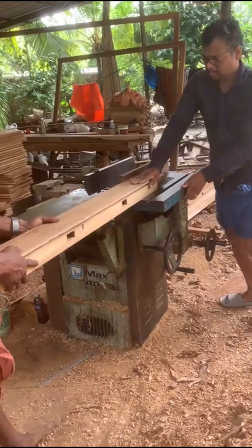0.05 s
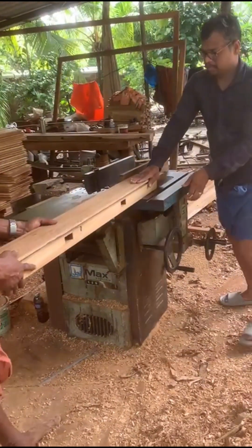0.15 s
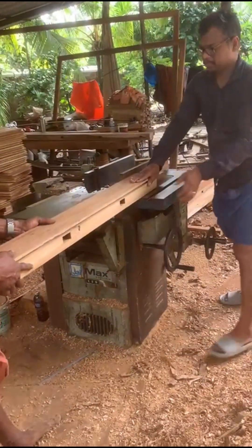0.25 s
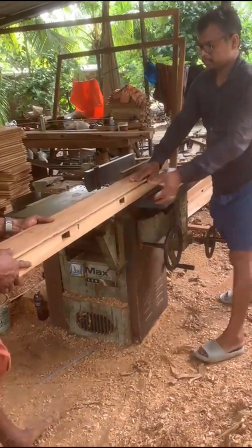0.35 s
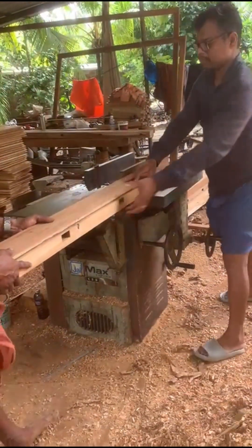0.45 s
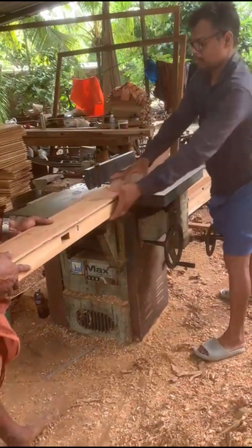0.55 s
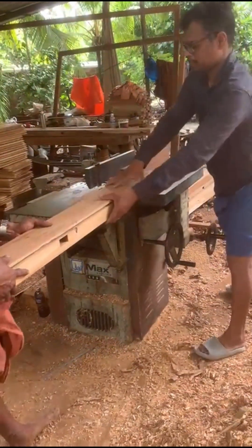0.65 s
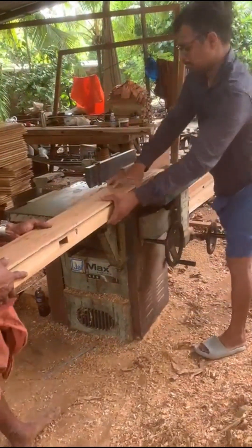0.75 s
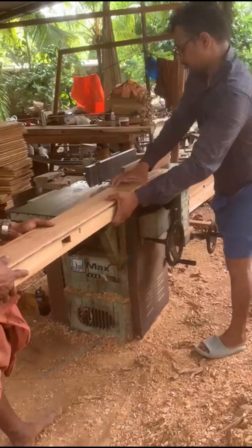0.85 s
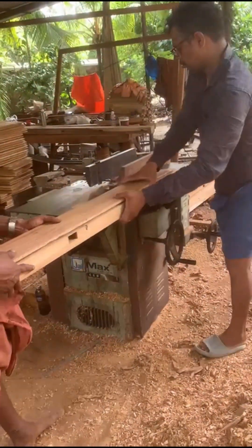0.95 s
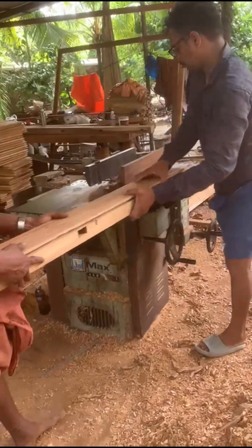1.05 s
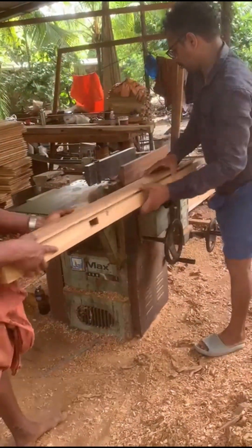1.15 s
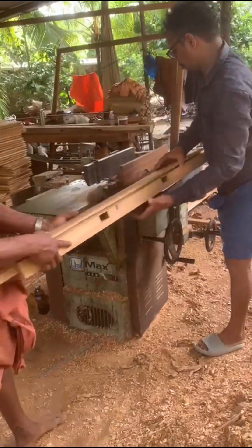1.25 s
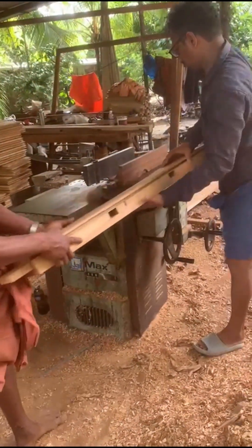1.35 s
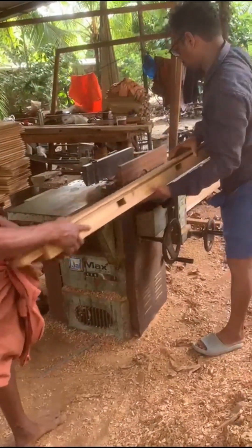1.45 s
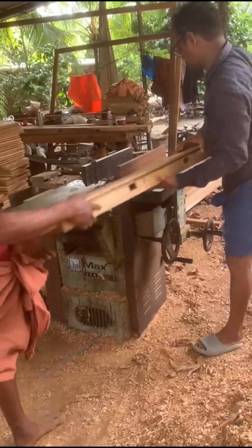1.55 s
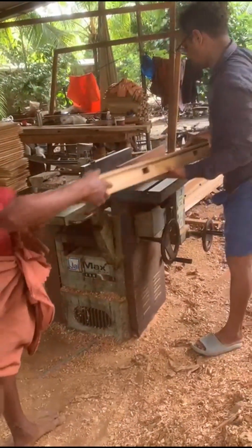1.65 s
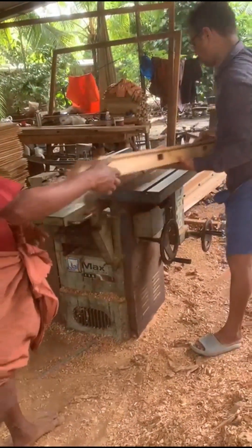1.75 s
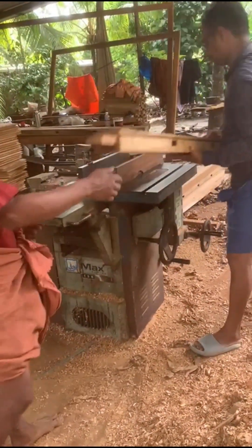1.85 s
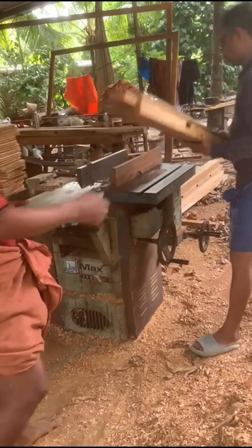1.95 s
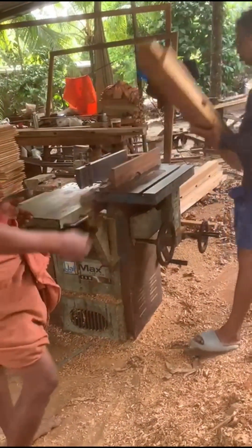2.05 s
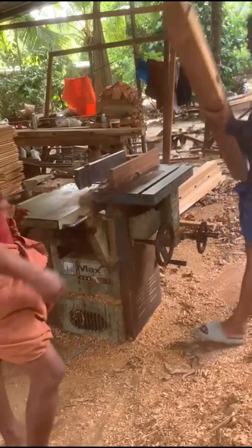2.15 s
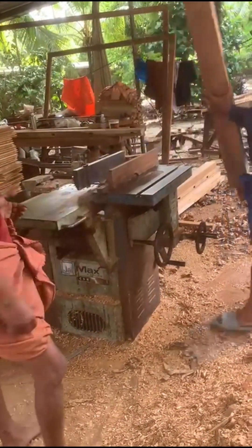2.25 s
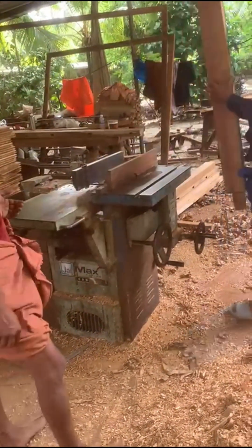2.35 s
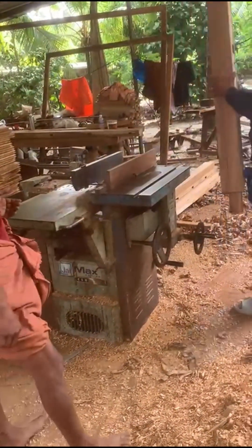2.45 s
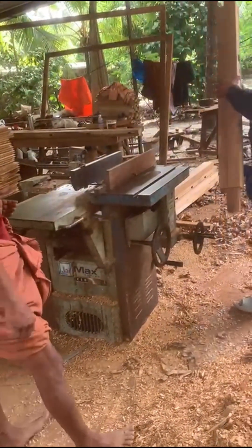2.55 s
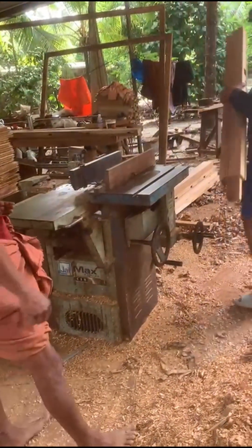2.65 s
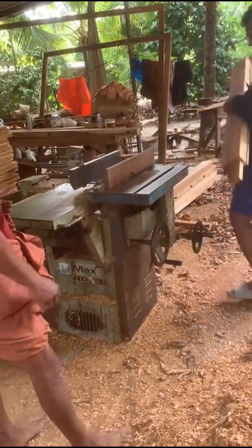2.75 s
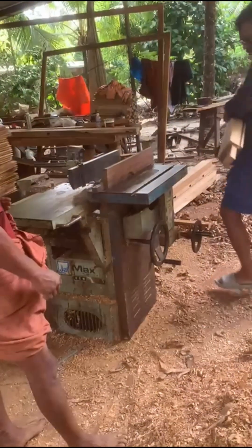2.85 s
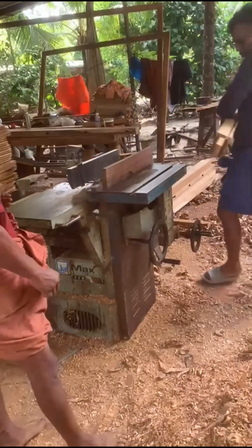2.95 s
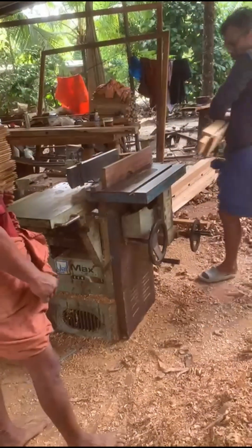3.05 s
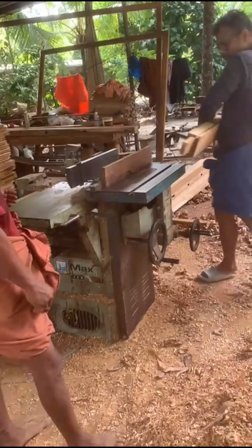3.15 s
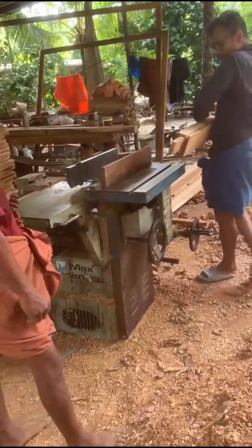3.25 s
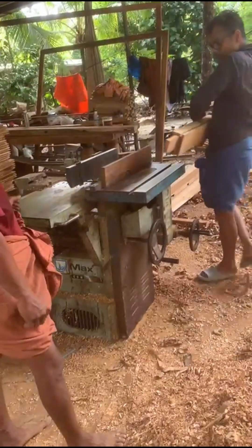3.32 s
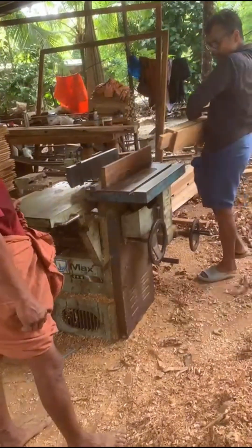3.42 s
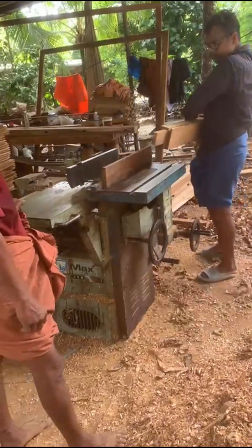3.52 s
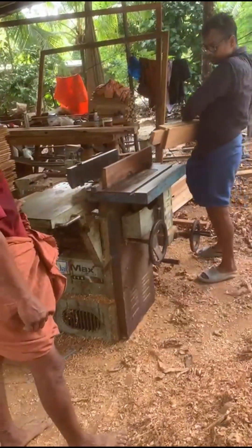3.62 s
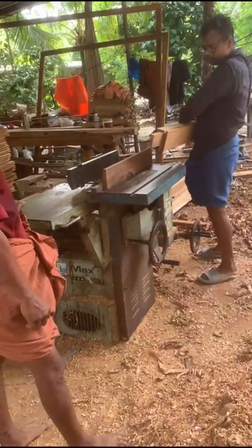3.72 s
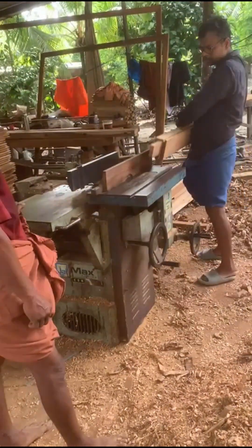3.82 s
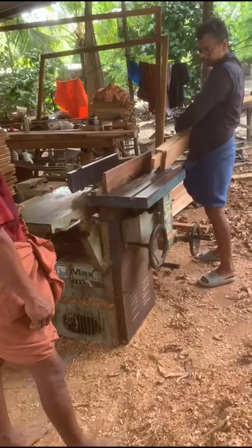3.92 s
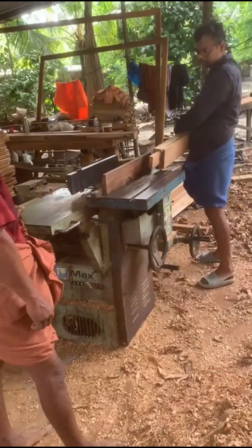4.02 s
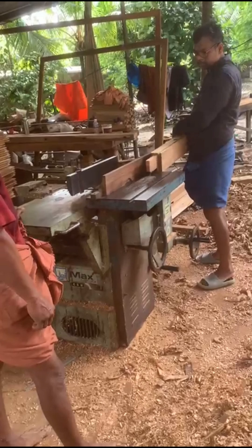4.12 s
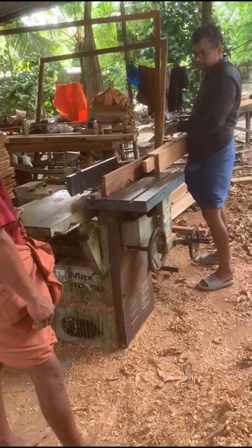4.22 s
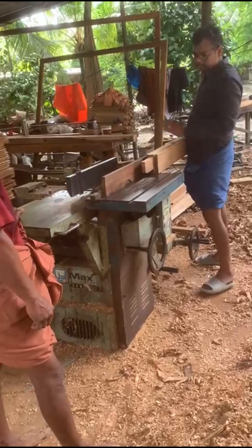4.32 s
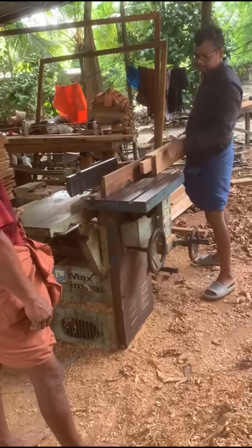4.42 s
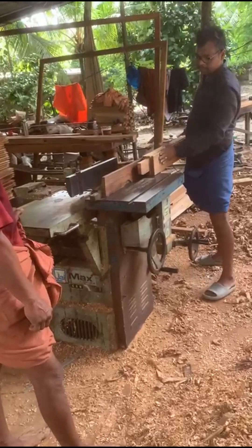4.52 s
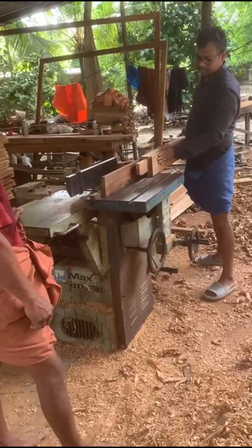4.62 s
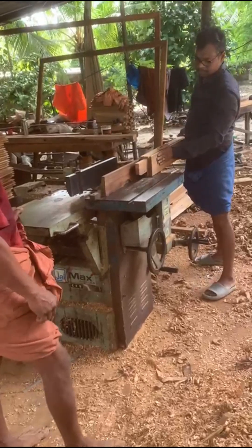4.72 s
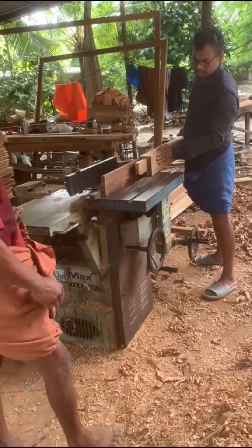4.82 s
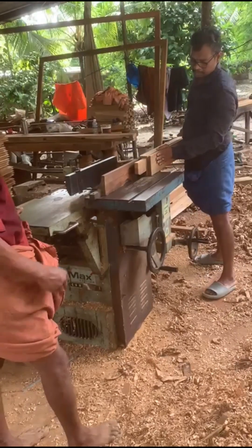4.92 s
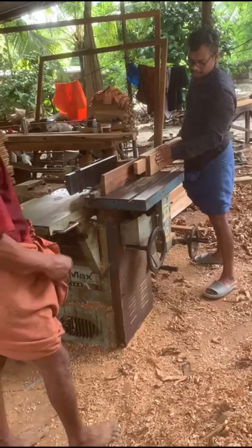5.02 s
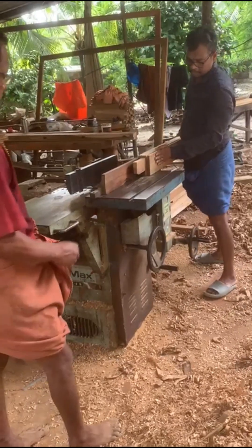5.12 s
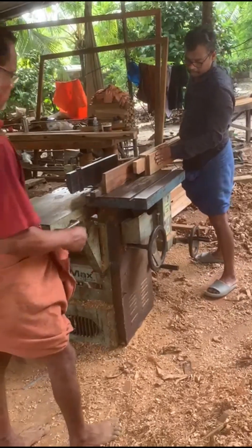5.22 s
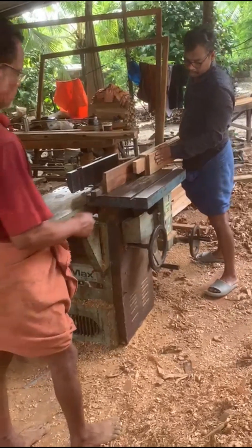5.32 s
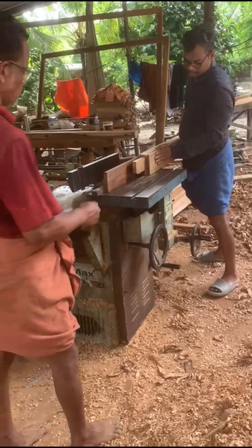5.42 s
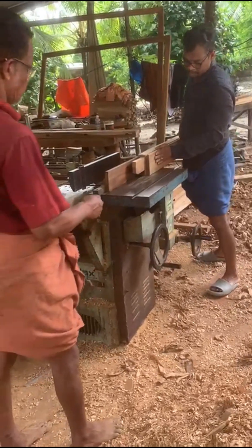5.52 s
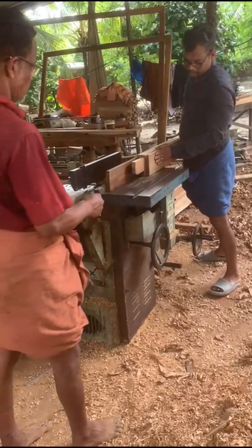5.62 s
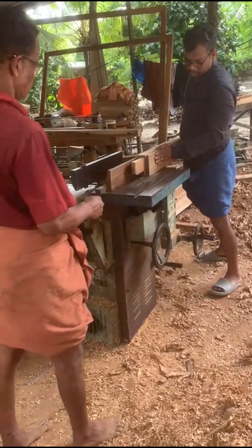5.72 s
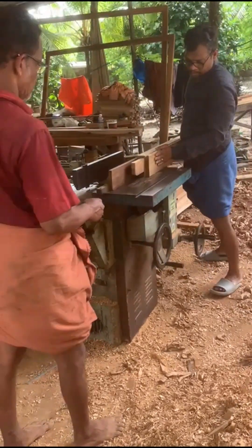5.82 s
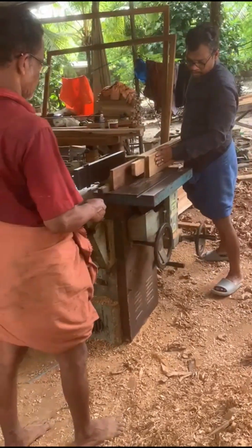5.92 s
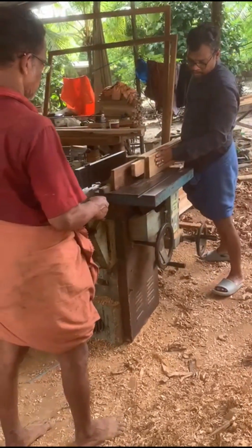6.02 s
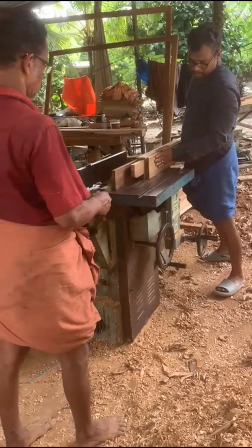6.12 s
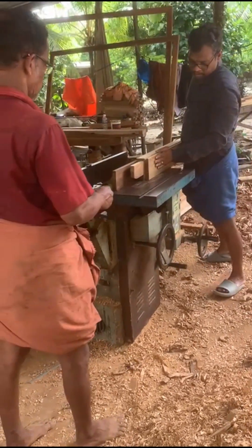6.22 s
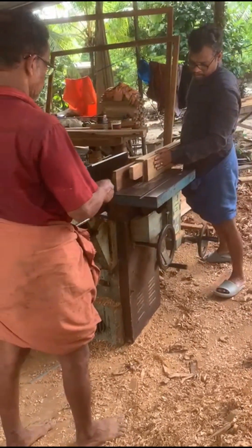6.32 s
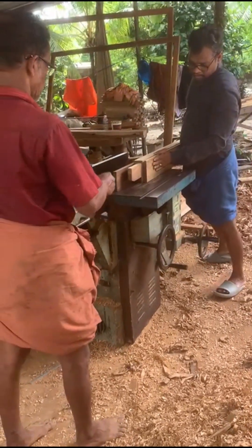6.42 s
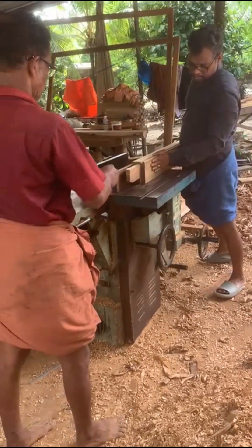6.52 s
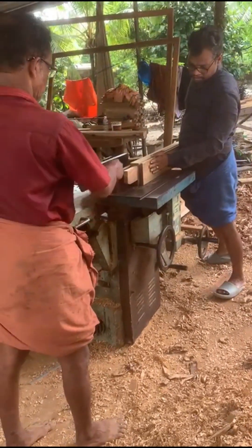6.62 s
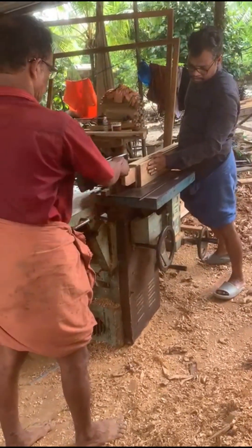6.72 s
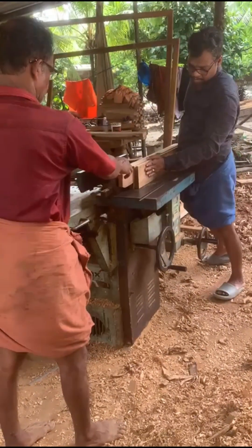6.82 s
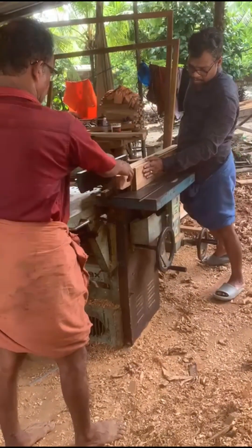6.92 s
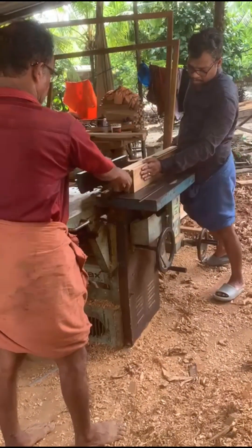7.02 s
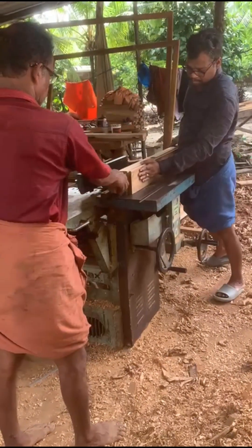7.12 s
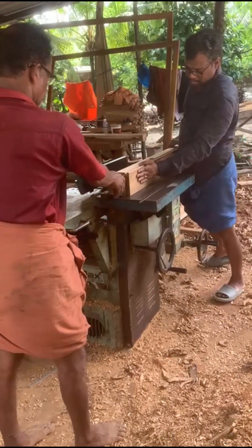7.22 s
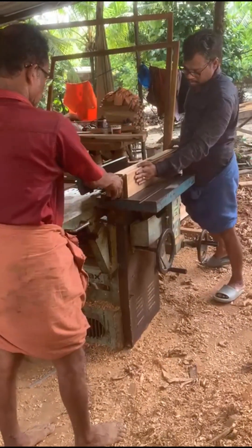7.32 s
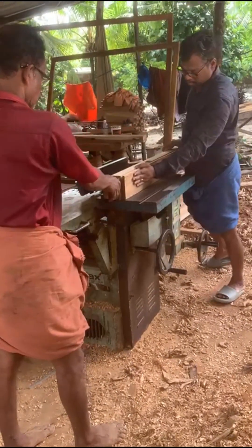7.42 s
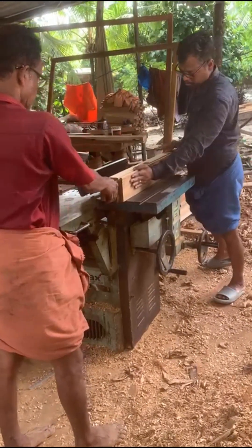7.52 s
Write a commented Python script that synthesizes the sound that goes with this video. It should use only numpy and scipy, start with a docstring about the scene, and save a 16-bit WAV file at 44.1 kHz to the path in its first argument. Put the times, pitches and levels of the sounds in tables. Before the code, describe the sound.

A woodworking planer idles with a throbbing hum and airy hiss, a plank knocks onto its table, then the knives bite with a loud, rasping, whining buzz.

```python
"""Wood planer in an open shed

A belt-driven planer idles: its three-knife cutter block hums, throbs and fans the air in shaped noise.
A plank knocks down on the table as short decaying modes; at six seconds it is pushed into the knives.
Chip noise hisses, knife impulses buzz and slap, sines whine at orders of the turning rate, and the
block slows a little. A helper steps in front and screens the rumble, throb and most knife-hum lines.
A microphone with two ports hears much of this out of step between its sides."""
import sys
import numpy as np
from scipy import signal
from scipy.fft import rfft, irfft, next_fast_len
from scipy.io import wavfile
from scipy.ndimage import uniform_filter1d, map_coordinates

SR = 44100
rng = np.random.default_rng(int(sys.argv[2]) if len(sys.argv) > 2 else 0)


def output_pcm(signal):
    """Save a mono or channel-first signal as 16-bit PCM at the path in sys.argv[1].

    Samples are clipped to [-1, 1] before scaling.
    """
    pcm = np.clip(np.atleast_2d(signal).T, -1, 1) * 32767
    wavfile.write(sys.argv[1], SR, np.round(pcm).astype(np.int16))


N = 333835
SECONDS = np.arange(N) / SR
SIDES = np.array([[1], [-1]])  # the two microphone ports

KNIVES = 3
# how hard each of the three knives strikes: level_db
KNIFE_LEVELS = [-3, -2, 0]
# spectrum of the wood under the knives, before levelling: freq_hz, level_db
CHIP_SPECTRUM = [(250, -36), (600, -11.5), (1050, -8.5), (1230, -18), (1550, -4), (2100, -3), (2320, -16.5),
                 (2500, -1.5), (2850, -12), (3100, -22), (3600, -20), (4050, -7.5), (4450, 0.5), (5300, 3),
                 (5700, -6), (5950, -1.5), (6400, -3), (7100, 2), (7500, -4.5), (8000, 3.5), (8300, 2),
                 (8550, -11.5), (10000, -1.5), (10700, -14), (11250, 0.5), (11700, -13)]
# the plank meets the knives and is cut to full depth within a moment
ENTRY_S, ENTRY_RISE_S = 5.987, .08


def amp(db):
    """Decibels to gain."""
    return 10 ** (np.asarray(db) / 20)


def unit(x):
    """x at rms 1."""
    return x / np.sqrt(np.mean(x ** 2) + 1e-20)


def along(points, hz):
    """(Hz, value) points read on a log axis."""
    f, v = np.transpose(points)
    return np.interp(np.log(hz + 1), np.log(f + 1), v)


def wobble(rate, step=16):
    """A smooth random curve, rate knots a second, drawn every step samples and joined by lines."""
    at = np.arange(0, N + step, step)
    knots = rng.standard_normal(int(N * rate / SR) + 4)
    return np.interp(np.arange(N), at, map_coordinates(knots, [at * rate / SR]))


def filtered(x, response):
    """x times a response of frequency."""
    m = next_fast_len(N + SR // 2)
    return irfft(rfft(x, m) * response(np.fft.rfftfreq(m, 1 / SR)), m)[..., :N]


def coloured(x, spectrum):
    """x shaped by (Hz, dB) points, at rms 1."""
    return unit(filtered(x, lambda hz: amp(along(spectrum, hz))))


def patchy(x, depth_db, size):
    """Resonances come and go: random gain in patches of size (bins, frames)."""
    z = signal.stft(x, nperseg=1024)[2]
    field = rng.standard_normal(z.shape[1:])
    for axis in (0, 1):
        field = uniform_filter1d(field, size[axis], axis=axis)
    return signal.istft(z * amp(depth_db * unit(field)), nperseg=1024)[1][:, :N]


def tone(turns, waver_db, drift, rate=6):
    """A sine of rms 1 whose level (dB) and phase (radians) wander, rate times a second."""
    phase = 2 * np.pi * turns + rng.uniform(-np.pi, np.pi) + drift * wobble(rate)
    return unit(amp(waver_db * wobble(rate)) * np.cos(phase))


def ramp(start_s, length_s):
    """0 before the start, rising evenly to 1."""
    return np.clip((SECONDS - start_s) / length_s, 0, 1)


def swell(s, length_s):
    """A smooth bump of height 1 centred on s."""
    return np.exp(-(2 * (SECONDS - s) / length_s) ** 2)


def idled():
    """Seconds of idling so far; stops counting when the cut begins."""
    return np.minimum(SECONDS, ENTRY_S)


def screened():
    """How far the helper, stepping in front, screens the machine, 0-1."""
    return ramp(6.52, .2)


def speed():
    """Turns per second: the cut slows the block, which then begins to recover."""
    idle_hz, sag_hz, recover_hz_per_s = 72.06, .9, .4
    sag = sag_hz * ramp(6.15, .5)
    return idle_hz - sag + recover_hz_per_s * np.maximum(SECONDS - 7.1, 0)


def firmness():
    """How firmly the plank lies, 0-1: it settles flat on the tables, then works a little loose."""
    return np.interp(SECONDS, [6.5, 6.74, 7.05, 7.25], [.35, .72, .72, .45])


def catches():
    """The knives meet changing grain: brief level changes (dB) of the cut and of the slapping."""
    # moments of catching: centre_s, length_s, cut_change_db, slap_change_db
    catch_rows = [(6.02, 0.02, 2.5, -14), (6.098, 0.05, 2.3, 7), (6.16, 0.04, 2.5, -4),
                  (6.24, 0.05, 2.5, -14), (6.42, 0.04, 1.5, -6), (6.485, 0.05, 3, -8),
                  (6.565, 0.04, 2.5, -8), (6.715, 0.05, 2.5, 0), (6.775, 0.06, 3.5, 1),
                  (6.895, 0.06, 4.5, 2), (6.97, .04, 1.5, 1), (7.04, 0.08, 3, 1.5), (7.29, .07, -1.5, -3),
                  (7.42, 0.05, 4, 6), (7.56, 0.07, 3.5, -1)]
    return sum(np.outer([cut_db, slap_db], swell(s, length_s)) for s, length_s, cut_db, slap_db in catch_rows)


def flare(k):
    """Extra level (dB) where the k-th multiple of the turning rate flares or fades briefly."""
    # flaring lines: centre_s, length_s, multiple_of_turning_rate, change_db
    flare_rows = [(0.095, 0.82, 12, -14), (.1, 0.8, 15, -11), (2.4, 1.2, 15, 3.5), (.5, 0.84, 24, -15),
                  (.6, 1.8, 18, -5.5), (1.7, 0.82, 1, 3), (2.007, 0.36, 6, 3), (2.368, 0.4, 6, -6),
                  (2.65, 1, 1, -1.5), (3.6, 0.75, 1, 4), (4.498, 0.51, 18, 5), (4.45, 1.4, 6, 1.5),
                  (5.303, 0.68, 1, 4.5), (6.42, 0.8, 3, 3), (7.55, 0.54, 12, -19)]
    return sum(db * swell(s, length_s) for s, length_s, multiple, db in flare_rows if multiple == k)


def blows(turns, knife):
    """One band-limited impulse a turn, when the given knife meets the wood."""
    turn_ends = np.arange(1, int(turns[-1]) - 1)
    at = np.interp(turn_ends + knife / KNIVES, turns, np.arange(N))
    # a short sinc places each impulse between samples
    taps = at.astype(int)[:, None] + np.arange(-8, 9)
    return np.bincount(taps.ravel(), np.sinc(taps - at[:, None]).ravel(), N)[:N]


def draught(turns, split_hz=2200, pulsing=.35, flutter_db=.98):
    """Air rushes round the block: the rumble puffs as each knife passes, the hiss flutters."""
    # spectrum of the thrown air, before levelling: freq_hz, level_db
    air_spectrum = [(25, -21), (55, 1), (150, -2.5), (300, 1), (450, 0.5), (1000, 2), (1250, -7),
                    (1500, -5), (2000, -3.5), (2600, -29.5), (3600, -1), (4800, -13), (6000, -15.5),
                    (8000, -13), (11500, -16)]
    # both grow slowly louder until the cut; the helper screens the rumble by 4 dB
    rumble_db = -44.5 + 1.0 * idled() - 4 * screened()
    hiss_db = -45 + 1.2955 * idled() + flutter_db * wobble(14)
    puffs = 1 + pulsing * np.cos(2 * np.pi * KNIVES * turns)
    air = coloured(patchy(rng.standard_normal((2, N)), depth_db=2.5, size=(6, 6)), air_spectrum)
    low = filtered(air, lambda hz: 1 / (1 + (hz / split_hz) ** 4))
    return amp(rumble_db) * low * puffs + amp(hiss_db) * (air - low)


def shake(turns, belt_hz=84.4, belt_db=-5.0):
    """Block unbalance and belt flapping shake the frame and beat together in a low throb."""
    unbalance = tone(turns, waver_db=-.5, drift=.1)
    belt = tone(belt_hz * SECONDS, waver_db=4.0, drift=.72)
    level_db = -53.5 + .39 * idled() - 5 * screened() + flare(1)
    return amp(level_db) * (unbalance + amp(belt_db) * belt)


def hum(turns, drift_per_order=.012, jitter_turns=.004):
    """Knives chop the air at the table lips; higher block lines waver; motor and bearings add lines."""
    # knives passing the lips: multiple_of_turning_rate, level_db, swell_db_per_s, screen_loss_db, waver_db
    lip_lines = [(3, -42, 0.57, 2, 0.55), (6, -47, 1.22, 5, 1), (12, -45, -0.06, -1.5, 2),
                 (15, -46, -.4, 10, 2)]
    # weaker lines of the block: multiple_of_turning_rate, level_db
    block_lines = [(2, -57), (4, -59), (9, -52.5), (18, -52), (24, -51.5), (27, -52), (30, -49)]
    # motor, belt and bearings: freq_hz, level_db
    motor_lines = [(258, -66.5), (305.5, -57), (334.4, -58.5), (918, -58.5), (974.4, -52.5),
                   (1030.9, -51.5), (1060.5, -57), (1392, -57), (1698, -57)]
    out = np.zeros(N)
    for k, db, swell_db, loss_db, waver_db in lip_lines:
        level_db = db + swell_db * idled() - loss_db * screened() + flare(k)
        out += amp(level_db) * tone(k * turns, waver_db, drift=.04, rate=2.99)
    shaken = turns + jitter_turns * wobble(30)
    for k, db in block_lines:
        out += amp(db + flare(k)) * tone(k * shaken, waver_db=4.5, drift=drift_per_order * k, rate=24)
    for hz, db in motor_lines:
        out += amp(db) * tone(hz * SECONDS, waver_db=1.5, drift=1.0)
    return out


def knocks(soft_s=.002, thud_db=-6, thud_s=.09, scatter_db=1.3):
    """The plank lands on the iron table: a thud and a short ring, duller at a low contact brightness."""
    # the plank set down: start_s, level_db (before the low-pass), brightness_hz (low-pass corner)
    landings = [(4.005, -28, 500), (4.029, -27, 450), (4.196, -31, 1400), (4.207, -22, 320),
                (4.251, -27, 1500), (4.259, -23, 1200), (4.277, -28, 1200)]
    # modes of the plank: freq_hz, level_db (before scatter), t60_s
    plank_modes = [(139, -12, 0.05), (250, -5, 0.08), (298, -10, 0.06), (436, -9, .06), (610, -4.5, 0.07),
                   (700, -8, .06), (1044, -14, 0.04)]
    out, t = np.zeros(N + SR), np.arange(SR // 4) / SR
    thud_band = signal.butter(2, [150, 1100], "band", fs=SR, output="sos")
    for s, db, bright_hz in landings:
        ring = sum(amp(level_db + rng.normal(0, scatter_db) - 60 * t / t60_s) * np.sin(2 * np.pi * hz * t)
                   for hz, level_db, t60_s in plank_modes)
        thud = unit(signal.sosfilt(thud_band, rng.standard_normal(len(t))))
        blow = (ring + thud * amp(thud_db - 60 * t / thud_s)) * (1 - np.exp(-t / soft_s))
        dulling = signal.butter(2, bright_hz, fs=SR, output="sos")
        out[round(s * SR):][:len(t)] += amp(db) * signal.sosfilt(dulling, blow)
    return out[:N]


def drone(turns):
    """Coming to lie on both tables, the plank hums at low orders that enter at staggered times."""
    # the bending drone: multiple_of_turning_rate, level_db, start_s, rise_s
    drone_lines = [(8, -49, 6.1, .7), (9, -53, 6.6, .6), (11, -43, 6.6, .4), (12, -53, 6.5, .4),
                   (14, -46.5, 6.65, .3), (15, -53, 6.5, .5)]
    return sum(ramp(start_s, rise_s) * amp(db) * tone(k * turns, waver_db=1.5, drift=.15)
               for k, db, start_s, rise_s in drone_lines)


def squeals(turns, pulsing=.7, rasp_per_order=.009, rasp_per_s=90):
    """The sliding plank falls in step with the knives: a rasping squeal that pulses once a turn."""
    # brief squeals: centre_s, length_s, multiple_of_turning_rate, level_db
    squeal_rows = [(6.12, .08, 83, -30), (6.27, .07, 83, -28), (6.41, .07, 83, -27), (6.58, .1, 83, -29),
                   (6.73, .11, 83, -29), (6.87, .07, 83, -32), (7.04, .17, 83, -28), (6.17, .06, 57, -33),
                   (6.5, .05, 63, -29), (6.18, .08, 29, -35), (6.265, .08, 27, -27.5), (6.27, .08, 34, -31),
                   (6.28, .17, 15, -38.5), (7.22, .16, 30, -37), (7.54, .09, 29, -34)]
    strokes = 5 + pulsing * np.cos(2 * np.pi * (turns - np.argmax(KNIFE_LEVELS) / KNIVES))
    out = np.zeros(N)
    for s, length_s, k, db in squeal_rows:
        rasp = tone(k * turns, waver_db=3, drift=rasp_per_order * k, rate=rasp_per_s)
        out += amp(db) * swell(s, length_s) * unit(strokes * rasp)
    return out


def chatter(turns, uneven_db=.8, contact_s=.0007):
    """The proudest knife slaps the plank on the table once a turn; its modes reach the ports out of step."""
    # modes of the slap, before levelling: freq_hz, level_db, t60_s, port_phase_rad
    slap_modes = [(1425, 9, 0.04, 2.2), (1505, 12, .025, 1.3), (1705, 8, 0.04, 1.8), (3220, 2, .022, 2.3),
                  (4050, 4, .012, 1.6), (4560, 14, .018, 2.0), (5920, 7, 0.018, -1), (7120, 3, .008, 0),
                  (8200, 6, .006, 1.2)]
    t = np.arange(SR // 8) / SR
    contact = (1 - np.exp(-t / contact_s)) ** 2
    strikes = blows(turns, np.argmax(KNIFE_LEVELS))
    slaps = np.zeros((2, N))
    for hz, db, t60_s, lead in slap_modes:
        ring = contact * amp(db - 60 * t / t60_s) * np.sin(2 * np.pi * hz * t + SIDES * lead / 2)
        uneven = strikes * amp(uneven_db * wobble(7.3))  # each mode swells on its own
        slaps += signal.oaconvolve(uneven[None], ring, axes=1)[:, :N]
    level_db = -43 + 21.5 * firmness() + catches()[1]
    return ramp(ENTRY_S, ENTRY_RISE_S) * amp(level_db) * unit(slaps)


def tearing(turns, strike_turns=.93, sustain=1.0, bright_hz=4500):
    """Each knife tears off a chip: bright noise jumps up at the strike and eases off until the next."""
    knife, since = np.divmod(turns * KNIVES, 1)
    force = amp(KNIFE_LEVELS)[knife.astype(int) % KNIVES]
    burst = sustain + force * np.exp(-since / KNIVES / strike_turns)
    # the plank's narrow resonances shift as it slides, and its grain varies the effort
    fibres = patchy(rng.standard_normal((2, N)), depth_db=5, size=(2, 9)) * amp(.8 * wobble(30))
    bright = filtered(fibres * burst, lambda hz: hz / np.hypot(hz, bright_hz))
    return coloured(bright, CHIP_SPECTRUM)


def buzzing(turns, ring_s=.016, shed_s=.2, shed_db=-15, shift_rate=9, count=6):
    """Every knife cracks the plank and the shed answers; each knife's ring changes as the cut moves."""
    out, t = np.zeros((2, N)), np.arange(SR // 8) / SR
    decay = amp(-60 * t / ring_s) + amp(shed_db - 60 * t / shed_s)
    for knife, db in enumerate(KNIFE_LEVELS):
        # a shifting blend of several noise rings, at constant power
        blend = np.array([wobble(shift_rate) for _ in range(count)])
        blend /= np.linalg.norm(blend, axis=0)
        for strikes in amp(db) * blows(turns, knife) * blend:
            ring = decay * rng.standard_normal((2, len(t)))
            out += signal.oaconvolve(strikes[None], ring, axes=1)[:, :N]
    return coloured(patchy(out, depth_db=5, size=(2, 8)), CHIP_SPECTRUM)


def cut(turns, tearing_db=.5, buzz_db=4.2, fade_db_per_s=2.5, grain_db=.8):
    """Knives ring the plank in a buzz under a hiss of torn chips; the firmer it lies, the purer the buzz."""
    # higher orders that sing out: multiple_of_turning_rate, level_db (re the cut, before firmness)
    whine_lines = [(29, -17), (30, -19), (35, -16), (39, -21), (45, -18), (54, -17), (57, -14), (63, -12),
                   (83, -14), (86, -15), (100, -13), (113, -13), (116, -12)]
    even = firmness()
    # the wood's grain makes the whole cut waver
    level_db = -23.5 - fade_db_per_s * (SECONDS - ENTRY_S) + catches()[0] + grain_db * wobble(20)
    whine = sum(amp(db) * tone(k * turns, waver_db=6.0, drift=1.0, rate=12) for k, db in whine_lines)
    ringing = amp(buzz_db) * buzzing(turns) + whine * [[1], [0]]  # the whine arrives directly
    chips = amp(tearing_db) * tearing(turns)
    mix = np.sqrt(1 - even) * chips + np.sqrt(even) * ringing
    return ramp(ENTRY_S, ENTRY_RISE_S) * amp(level_db) * mix


def ports(direct, scattered):
    """Two ports hear the sound out of step; they are least alike a quarter cycle apart."""
    # phase between the microphone ports: freq_hz, phase_rad
    port_phases = [(850, 0), (1080, -.4), (1300, 2), (1520, 2.5), (1750, 2), (2150, 2.1), (2480, 2.65),
                   (2750, 3.1), (3000, 3.12), (3250, 2.4), (3850, 1.4), (4900, 2.95), (5450, 2.85),
                   (6400, 0), (7600, 0), (8300, 1.5), (9050, 3.14), (10400, 3.14), (11300, .5), (11600, .3)]

    def share(hz):
        """Power share of the scattered sound."""
        return .25 * np.sin(along(port_phases, hz)) ** 2

    common = filtered(direct, lambda hz: np.sqrt(1 - share(hz)))
    opposed = filtered(scattered, lambda hz: np.sqrt(share(hz)))
    return filtered(common + SIDES * opposed, lambda hz: np.exp(.5j * SIDES * along(port_phases, hz)))


def scene():
    """One turning block drives draught, hum and cut."""
    turns = np.cumsum(speed()) / SR
    direct, scattered = draught(turns) + cut(turns)
    machine = shake(turns) + hum(turns)
    plank = knocks() + drone(turns) + squeals(turns)
    return ports(direct + machine + plank, scattered) + chatter(turns)


def record(dry, top_hz=11750):
    """The recorder keeps nothing above its band limit."""
    return filtered(dry, lambda hz: hz < top_hz)


dry = scene()
out = record(dry)
output_pcm(out)
```